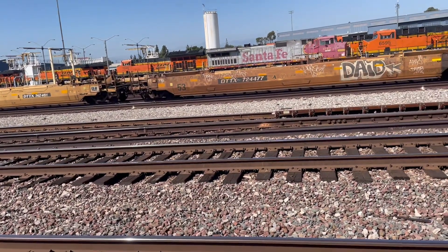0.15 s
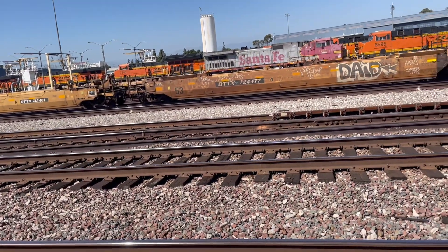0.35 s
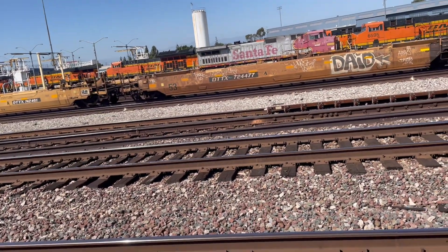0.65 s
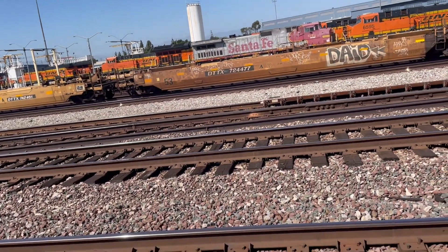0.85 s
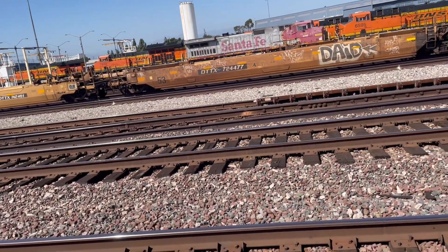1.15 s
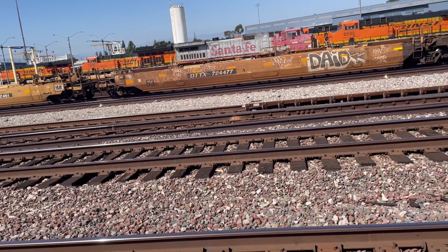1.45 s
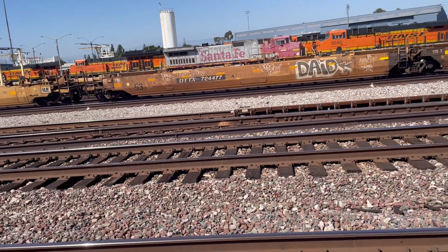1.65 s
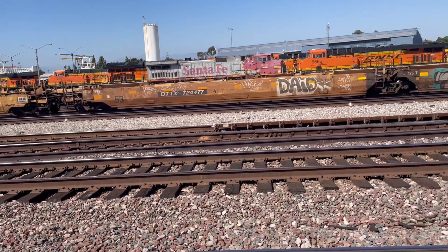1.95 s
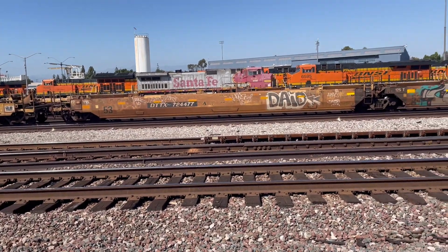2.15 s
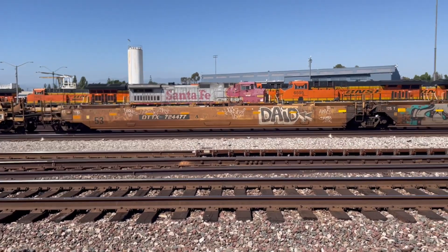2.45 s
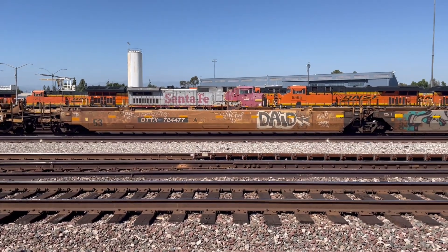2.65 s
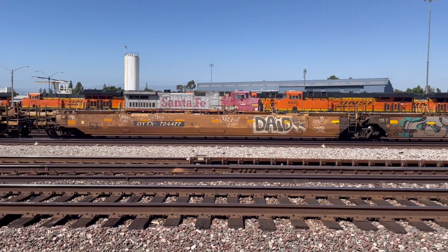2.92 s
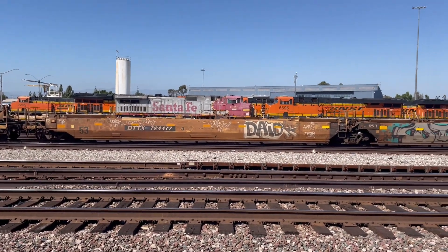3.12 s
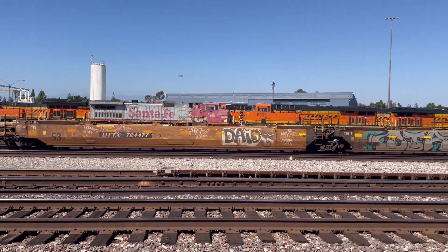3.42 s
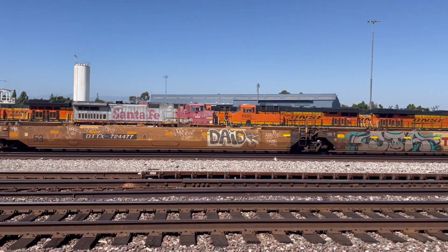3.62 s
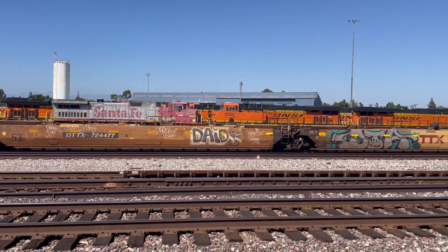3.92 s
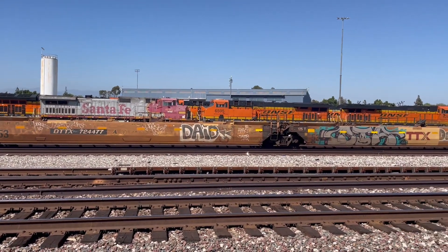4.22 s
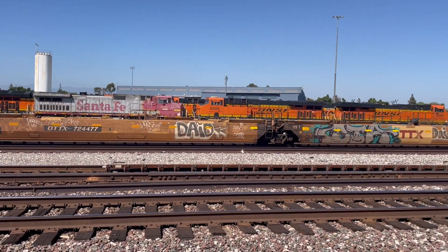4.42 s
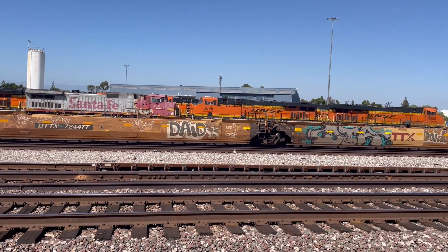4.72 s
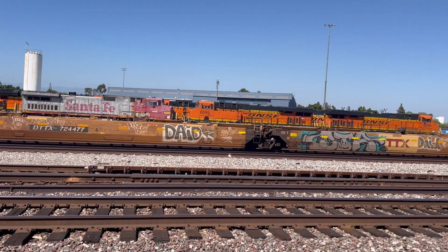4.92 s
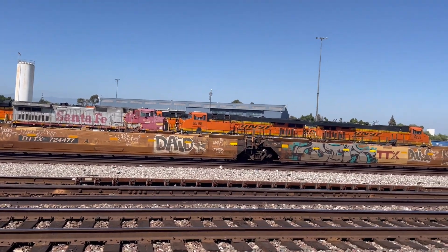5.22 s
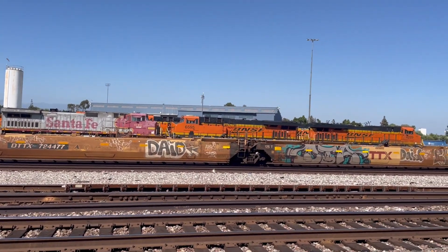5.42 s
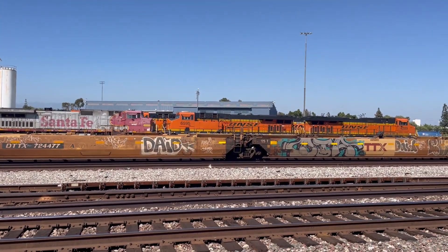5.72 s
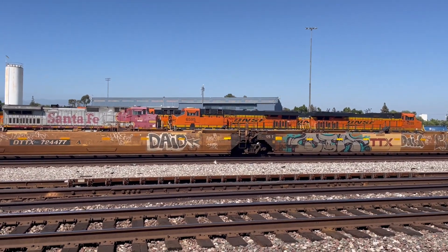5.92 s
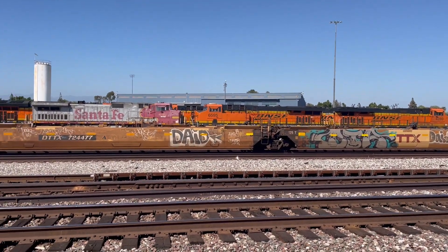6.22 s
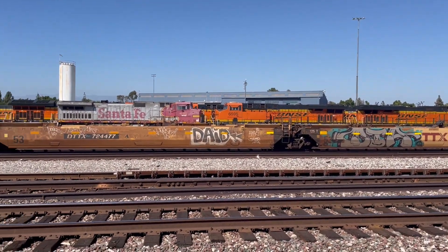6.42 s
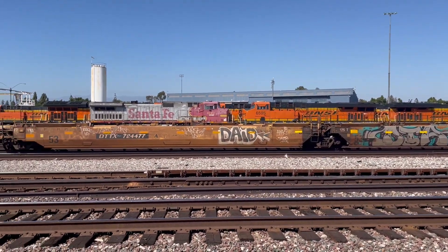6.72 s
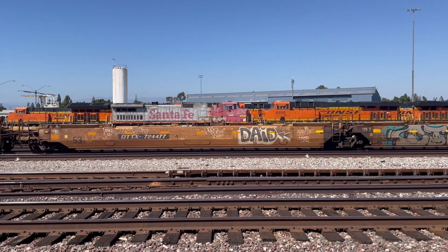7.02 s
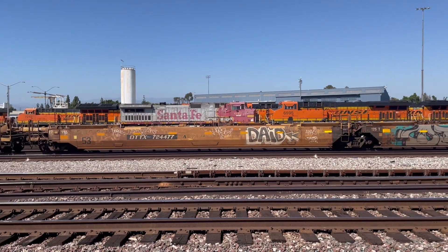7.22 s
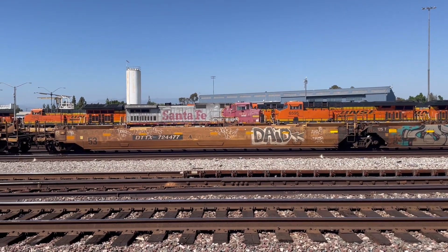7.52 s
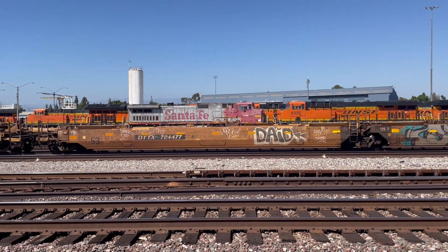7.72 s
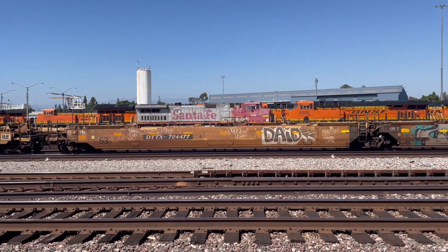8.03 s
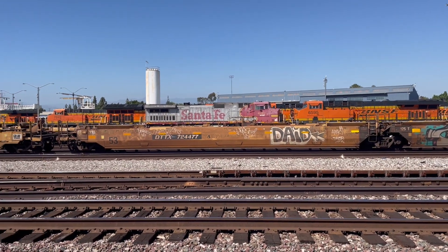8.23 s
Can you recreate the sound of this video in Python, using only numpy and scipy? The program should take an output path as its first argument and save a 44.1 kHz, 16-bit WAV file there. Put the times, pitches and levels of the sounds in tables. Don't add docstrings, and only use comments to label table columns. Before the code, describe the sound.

Low pulsing engine rumble, humming and fan roar in an open yard, buffeted by wind thuds, with air hisses, gritty ticks and insect chirps.

```python
import sys
import numpy as np
from scipy import signal
from scipy.fft import rfft, irfft, next_fast_len
from scipy.io import wavfile
from scipy.ndimage import uniform_filter1d, map_coordinates

SR = 44100
rng = np.random.default_rng(int(sys.argv[2]) if len(sys.argv) > 2 else 0)


def waveform_to_disk(signal):
    frames = np.transpose(np.atleast_2d(signal))
    scaled = np.clip(frames, -1, 1) * 32767
    samples = np.round(scaled).astype(np.int16)
    wavfile.write(sys.argv[1], SR, samples)


def elevation(decibels):
    levels = np.asarray(decibels, float)
    return 10 ** (levels / 20)


N = 368676
T = np.arange(N) / SR

# f/Hz, correlation [-1..1]
PORT_LIKENESS = [(60, 0.62), (200, 0.94), (690, 0.13), (1030, 0.35), (1500, 0.31), (2750, 0.05),
                 (3300, 0.38), (4000, 0.22), (4650, 0.45), (5400, 0.21), (6400, 0.53), (7200, 0.24),
                 (7700, 0.65), (8700, 0.85), (11500, 0.73), (13000, 0.9)]
# f/Hz, density/dB per Hz
JET_SPECTRUM = [(700, -120), (1200, 2.5), (1800, 2.5), (2500, 1.5), (3300, 2), (4200, -1), (5200, -1.5),
                (5600, -7), (6400, -6.5), (7000, -9.5), (7500, -15.5), (8100, -11.5), (9000, -30),
                (10000, -120)]
# f/Hz, density/dB per Hz
FIZZ_SPECTRUM = [(7000, -120), (8000, -1.5), (8700, 0), (9400, 1), (10200, -1.5), (12200, -3.5),
                 (12900, -15.5), (13600, -35), (14500, -120)]


def unit(x):
    return x / np.sqrt(np.mean(x ** 2) + 1e-20)


def along(points, hz):
    f, v = np.transpose(points)
    return np.interp(np.log(hz + 1), np.log(f + 1), v)


def curves(rows):
    s, *cols = np.transpose(rows)
    return [np.interp(T, s, c) for c in cols]


def wobble(rate):
    knots = rng.standard_normal(int(N * rate / SR) + 4)
    return map_coordinates(knots, [T * rate])


def filtered(x, response):
    m = next_fast_len(N + SR // 2)
    return irfft(rfft(x, m) * response(np.fft.rfftfreq(m, 1 / SR)), m)[..., :N]


def rush(spectrum, alike, patchy_db):
    z = signal.stft(rng.standard_normal((2, N)), nperseg=512)[2]
    field = uniform_filter1d(rng.standard_normal(z.shape[1:]), size=6, axis=0)
    field = uniform_filter1d(field, size=12, axis=1)
    pair = signal.istft(z * elevation(patchy_db * unit(field)), nperseg=512)[1][:, :N]

    def mid_side(hz):
        angle = np.arccos(np.clip(along(alike, hz), -1, 1)) / 2
        return elevation(along(spectrum, hz)) * [np.cos(angle), np.sin(angle)]

    mid, side = filtered(pair, mid_side)
    return unit(np.array([mid + side, mid - side]))


def tone(hz, drift, swell_db):
    level_db = swell_db * wobble(1.496) + 2.6 * wobble(7)
    return elevation(level_db) * np.sin(2 * np.pi * (hz * T + rng.random()) + drift * wobble(5.0))


def add(out, s, sound, pan_db, lag=0):
    for side, sign in enumerate((.5, -.5)):
        spot = out[side, round(s * SR) + lag * (1 - side):][:len(sound)]
        spot += elevation(sign * pan_db) * sound[:len(spot)]


def near_engine():
    # crank angle [degrees of 720], level/dB
    cylinders = [(29.9, -9.2), (66.0, -6.8), (109.1, -1.3), (151.8, -5.6), (206.3, -1.8), (256.6, -3.5),
                 (297.6, 2.3), (344.7, -5.9), (404.4, 1.1), (425.6, -1.8), (479.4, -4.1), (532.1, 2.4),
                 (571.6, 2.1), (599.1, -0.3), (644.7, -2.7), (697.7, 1.9)]
    cycle_hz, stack_hz, stack_width_hz = 1.6252, 56, 22
    degrees, db = np.transpose(cylinders)
    cycles = np.arange(int(N / SR * cycle_hz) + 1)[:, None]
    s = (cycles + degrees / 720) / cycle_hz
    strength = elevation(db + 0.8 * rng.standard_normal(s.shape))
    puffs = np.bincount(np.round(s * SR).astype(int).ravel(), strength.ravel())[:N]

    def stack(f):
        damping = 1j * f * stack_width_hz
        return (damping / (stack_hz ** 2 - f * f + damping)) ** 2

    return unit(filtered(puffs, stack))


def far_engine():
    # order, level/dB
    orders = [(7, -19), (8, 8), (9, -2), (12, -23.5), (14, -24)]
    shaft_hz, start_turns = 6.474, .121
    crank = 2 * np.pi * (shaft_hz * T + start_turns)
    return unit(sum(elevation(db + 1.4 * wobble(1.2)) * np.sin(k * crank + 0.091 * wobble(1.5))
                    for k, db in orders))


def alternator():
    # multiple, level/dB rms
    harmonics = [(2, -55), (3, -70), (4, -52), (5, -63), (6, -60.5), (8, -57.5), (9, -59.5), (10, -68)]
    base_hz = 116.56
    return sum(elevation(db + 3.5) * tone(base_hz * k, drift=.13 * k, swell_db=1.0) for k, db in harmonics)


def cooling_fans(effort_db):
    # f/Hz, density/dB per Hz
    roar = [(88, -24.5), (150, -5.5), (174, -11.5), (350, -10), (434, -13.5), (472, -10), (521, -17.5),
            (680, -14), (901, -13.5), (1410, -23.5), (1640, -23), (3630, -44), (4590, -43.5), (7930, -51.5),
            (10300, -90), (17400, -120)]
    level_db = -44 + effort_db + 5.0 + 0.69 * wobble(3.5)
    return elevation(level_db) * rush(roar, PORT_LIKENESS, patchy_db=1.66)


def locomotives():
    # t/s, exhaust level/dB, fan effort/dB
    load = [(0.0, -37, 0.5), (0.7, -25, 0), (1.5, -24, 3), (2.3, -23.5, 2.5), (2.8, -21.5, 2),
            (3.6, -22, 1.5), (4.35, -23, 2), (4.6, -20.5, 1.5), (4.96, -21.5, 2.5), (5.35, -20, 3),
            (5.7, -21.5, 3), (6.02, -19, 2.5), (6.5, -22.5, 4.5), (7.15, -21.5, 3), (7.55, -24.5, 4.5),
            (7.85, -22.5, 2.5), (8.36, -19, 2.5)]
    # f/Hz, density/dB per Hz
    stack_noise = [(15, -29.5), (32, 3.5), (46, 11), (69, 2), (84, -3), (108, -8.5), (200, -37.5),
                   (260, -55), (440, -120)]
    exhaust_db, effort_db = curves(load)
    firing = near_engine() + elevation(-4.5) * far_engine()
    exhaust = elevation(3.5) * unit(firing) + elevation(-6.5) * rush(stack_noise, [(50, 0.95)], patchy_db=2.0)
    return elevation(exhaust_db) * exhaust + alternator() + cooling_fans(effort_db)


def blowers():
    # f/Hz, level/dB rms
    blade_tones = [(105.6, -44), (136.8, -46), (671.5, -63.5), (679, -63.5), (686.5, -64)]
    whine = sum(elevation(db + 2.5) * tone(hz, drift=.7, swell_db=1.0) for hz, db in blade_tones)
    return whine * np.ones((2, 1))


def air_hiss():
    # start t/s, length [s], peak level/dB, fizz over it/dB
    vents = [(1.162, 0.24, -59, -17), (1.514, 0.21, -55.5, -18), (1.927, 0.85, -57.5, -17),
             (2.997, 0.16, -59, -15), (3.35, 0.14, -60.5, -11), (3.774, 0.27, -64, -23),
             (4.21, 0.3, -60, -26), (4.5, 0.34, -58.5, -22), (5.197, 0.66, -58, -22.5),
             (5.55, 0.6, -60.5, -33), (6.023, 0.66, -51, -25), (6.488, 0.59, -53, -21.5),
             (6.925, 0.23, -57.5, -20), (7.095, 0.088, -53, -19), (7.216, 0.048, -52, -20),
             (7.47, 0.43, -44, -19.5), (7.723, 0.55, -47, -19.5), (8.18, 0.38, -55, -26)]
    rise_share = 0.31
    hiss = elevation(-58.5 + 0.29 * wobble(7.3)) ** 2
    top = hiss * elevation(-20) ** 2
    for s, length, db, fizz_db in vents:
        opening = np.interp((T - s) / length, [0, rise_share, 1], [0, 1, 0])
        flow = (elevation(db) * np.sin(np.pi / 2 * opening) ** 1.27) ** 2
        hiss = hiss + flow
        top = top + flow * elevation(fizz_db) ** 2
    jet = np.sqrt(hiss) * elevation(2.5 + 0.25 * wobble(25)) * rush(JET_SPECTRUM, PORT_LIKENESS, patchy_db=1.67)
    fizz = np.sqrt(top) * elevation(2.5 + 1.2 * wobble(40)) * rush(FIZZ_SPECTRUM, PORT_LIKENESS, patchy_db=2.5)
    return jet * elevation([[.8], [-.8]]) + fizz


def wind_pressure():
    # t/s, shared level/dB, crosswind over it/dB
    breeze = [(0.0, -56, 14), (0.2, -33.5, 1.5), (0.75, -43.5, 11.5), (1.05, -36.5, 7.5), (1.7, -26, -6.5),
              (1.87, -30.5, -6), (2.15, -22, -11), (2.55, -39.5, 3), (2.9, -26, -8), (3.2, -26, -2),
              (3.9, -31, -3.5), (4.55, -27.5, 1.5), (4.85, -35.5, -7), (5.5, -34, 2), (6.1, -25.5, -3.5),
              (6.7, -29, 6.5), (7.4, -29.5, 4), (8.36, -24, 3)]
    # f/Hz, density/dB per Hz
    shared_spectrum = [(10, -120), (25, -18.5), (50, -10), (72, 4.5), (95, -2), (130, -9), (250, -17.5),
                       (500, -33), (900, -120)]
    # f/Hz, density/dB per Hz
    opposed_spectrum = [(10, -120), (25, -22.5), (45, -6.5), (62, 2), (85, -5), (120, -18), (250, -19),
                        (500, -40), (900, -120)]
    shared_db, cross_db = curves(breeze)
    opposed_db = shared_db + cross_db + 1.5 * wobble(7.9) + 1.5
    shared_db = shared_db + .8 * wobble(4)
    shared = unit(elevation(2.2 * wobble(16)) * rush(shared_spectrum, [(100, 1.0)], patchy_db=1.0))
    opposed = unit(elevation(2.2 * wobble(12)) * rush(opposed_spectrum, [(100, -0.85)], patchy_db=3.0))
    return elevation(shared_db) * shared + elevation(opposed_db) * opposed


def gust_thump(t, db, sharp):
    turns, t60_s = 2.024, .13
    sweep = np.sin(2 * np.pi * turns * np.log(1 + t * 400 * sharp / turns))
    decay = elevation(db - 60 * t * sharp ** 0.39 / t60_s)
    return -decay * (1 - np.exp(-t * sharp / 0.0076)) * sweep


def gusts():
    # t/s, peak level/dB, sharpness
    head_on = [(0.115, -24, 2.15), (0.147, -21.5, 1), (0.243, -26, 2.9), (0.282, -25.5, 3.2),
               (0.356, -25, 2.4), (0.408, -24.5, 1.12), (0.902, -23, 2), (0.968, -22.5, 2.04),
               (1.251, -21, 1.34), (1.386, -18, 1.26), (1.578, -23.5, 0.8), (1.644, -36, 0.87),
               (1.699, -22, 1.44), (1.718, -13.5, 0.93), (1.81, -21, 0.89), (1.903, -17, 1.04),
               (1.996, -18, 1.02), (2.488, -10.5, 0.86), (2.602, -9.5, 0.72), (2.659, -13.5, 0.88),
               (3.147, -19, 1.25), (3.182, -12, 1.02), (4.24, -26, 1.67), (4.458, -11.5, 1.15),
               (4.507, -18.5, 0.92), (4.528, -17, 1.0), (4.54, -10.5, 0.83), (4.546, -22.5, 3.7),
               (1.122, -33, 5.0), (8.117, -25.5, 2.96), (5.845, -14, 0.77), (6.019, -9, 0.79),
               (8.058, -8, 1.04), (8.119, -5.5, 1.1)]
    # t/s, peak level/dB, sharpness
    light = [(0.054, -37, 1.47), (0.194, -24, 1.7), (0.523, -39, 1.6), (0.977, -25, 1.8),
             (1.228, -22, 0.95), (1.344, -23, 1.8), (1.608, -17, 1.66), (1.748, -18, 1.26),
             (1.984, -21, 1.4), (2.07, -14.5, 1.23), (2.148, -22, 1.48), (2.239, -28, 1.3),
             (2.421, -27, 1.77), (2.453, -23, 1.3), (2.504, -15, 1.65), (2.711, -35, 1.3), (3.319, -19, 1),
             (3.404, -31, 1.6), (3.445, -23, 1.3), (3.912, -25, 1.44), (3.996, -25, 0.59),
             (4.316, -23, 1.4), (4.467, -16.5, 1.67), (5.005, -23, 1.46), (5.455, -28, 1.8),
             (5.87, -15, 1.34), (6.063, -23, 1.5), (6.261, -9.5, 1.02), (6.58, -33, 1.2), (6.926, -27, 1.2),
             (7.485, -20, 1.57), (7.663, -31, 1.27), (7.736, -23, 1.12), (8.015, -24, 1.14),
             (8.089, -25, 1.2)]
    # t/s, peak level/dB
    dull = [(4.872, -18), (5.141, -21), (5.693, -25), (6.162, -12.5), (6.359, -17), (6.7, -15.5),
            (6.781, -15), (7.291, -20), (7.391, -24.5), (7.689, -22), (8.164, -14), (1.025, -28),
            (3.71, -26), (3.826, -27), (4.136, -26), (4.675, -27), (5.282, -28), (6.218, -27)]
    # f/Hz, density/dB per Hz
    turbulence = [(60, -120), (110, -5.5), (200, 5.5), (400, -8.5), (650, -14.5), (1100, -120)]
    blows = head_on + [(s, db - 6.5, sharp) for s, db, sharp in light]
    blows = blows + [(s, db, 0.783) for s, db in dull]
    out, t = np.zeros((2, N)), T[:SR // 8]
    flutter = rush(turbulence, [(200, 0.62)], patchy_db=3.5)
    for s, db, sharp in blows:
        shake = t / .03 * sharp ** 0.24
        swell = elevation(0.56 * db - 19.5) * 4 * shake * np.exp(-3 * shake)
        spot = slice(round(s * SR), round(s * SR) + len(t))
        out[:, spot] += swell[:out[0, spot].size] * flutter[:, spot]
        slap_delay_s, slap_sharp = rng.uniform(.008, 0.02164), sharp * rng.uniform(0.51, 1.0)
        for late, gain_db, edge in ((0, 5, sharp), (slap_delay_s, -3, slap_sharp)):
            thump = gust_thump(t, db + gain_db, edge)
            add(out, s + late, thump, rng.normal(0, 1.2), lag=rng.integers(20))
    return out


def grit():
    # t/s, peak level/dB, treble over it/dB
    scuffs = [(1.186, -45, -20), (1.239, -43, -31), (1.3694, -58, -22), (1.567, -39, -21),
              (1.694, -40, -25), (1.996, -38, -20), (2.031, -39.5, -20), (2.073, -36, -26),
              (2.251, -55, -38), (2.2994, -57, -21), (3.4, -50, -31), (4.3394, -60, -33), (4.899, -47, -19),
              (5.39, -41, -23), (6.29, -39, -25), (6.329, -38, -24), (6.719, -35.5, -22),
              (6.7786, -43, -20), (7.103, -37.5, -23), (7.125, -46, -28), (7.1705, -39.5, -29),
              (7.233, -44, -38)]
    # t/s, level/dB, length [s]
    spits = [
        (2.523, -64, 0.027),
        (2.575, -55, 0.052),
        (2.622, -64, .06),
        (2.689, -63, 0.058),
        (2.75, -68, .06),
        (2.826, -69, .06),
        (3.03, -73, .04),
        (3.287, -72, .03),
    ]
    # f/Hz, density/dB per Hz
    spark = [(7000, -120), (8500, 1), (10500, -1), (12500, 0), (14500, -9), (15500, -23), (16500, -120)]
    body, top, puffs = np.zeros((3, 2, N))
    t = T[:SR // 15]
    for s, db, top_db in scuffs:
        swell = elevation(db - 60 * t / 0.12) * (1 - np.exp(-t / 0.0034))
        crackle = elevation(3.2 * rng.standard_normal(len(t))) * rng.standard_normal(len(t))
        scuff = swell * crackle
        add(body, s, elevation(-1.5) * scuff, pan_db=-4.5)
        add(top, s, elevation(top_db + 8.0) * scuff, pan_db=6.0)
    for s, db, length in spits:
        swell = np.sin(np.pi * np.clip(t / length, 0, 1))
        add(puffs, s, elevation(db) * swell * rng.standard_normal(len(t)), pan_db=-2.5)
    layers = ((body, JET_SPECTRUM), (top, FIZZ_SPECTRUM), (puffs, spark))
    return sum(filtered(x, lambda hz: elevation(along(colour, hz))) for x, colour in layers)


def cricket():
    # t/s, peak level/dB
    chirps = [(0.1875, -54), (0.5352, -54.5), (0.8894, -54), (1.236, -51), (1.5834, -55), (1.9494, -57),
              (2.3143, -49.5), (2.6858, -52), (3.0335, -53), (3.456, -52.5), (3.8382, -50.5),
              (4.1814, -53.5), (4.579, -51), (4.9202, -52), (6.5383, -54), (6.8623, -54), (7.274, -54)]
    stroke_s, lead_in_s, pair_gap_s = .017, .004, .053
    wing_hz, fall_hz_per_s = 4830, 32000
    out, t = np.zeros((2, N)), T[:SR // 40]
    for s, db in chirps + [(s + pair_gap_s, db) for s, db in chirps]:
        swell = np.sin(np.pi * np.clip(t / stroke_s / rng.uniform(.9, 1.1), 0, 1))
        cycles = wing_hz * rng.normal(1, .004) * t - fall_hz_per_s / 2 * t * t * rng.uniform(.9, 1.1)
        stroke = swell * np.sin(2 * np.pi * cycles)
        add(out, s - lead_in_s, elevation(db - 1.7 + rng.normal(0, 0.65)) * stroke, pan_db=-3.0)
    return out


def bird():
    # t/s, f/Hz, level/dB
    calls = [
        [(5.6, 4010, -64), (5.628, 4500, -61), (5.664, 3920, -60), (5.686, 3350, -68), (5.7, 3200, -65)],
        [(3.782, 3740, -68), (3.8, 3420, -67), (3.822, 3100, -61)],
        [(8.24, 3060, -75), (8.266, 3000, -74), (8.276, 3158, -71), (8.29, 3098, -73)],
        [(6.955, 4250, -70), (6.972, 4450, -62), (6.982, 4680, -62), (6.992, 4400, -62), (7.002, 4100, -68)],
        [(7.458, 4950, -66), (7.467, 4680, -60), (7.478, 4600, -67)],
        [(8.218, 4810, -66), (8.23, 4700, -63), (8.245, 4600, -67)],
    ]
    out = np.zeros((2, N))
    for call, pan_db in zip(calls, (8, 5, 3, 0, 0, 0)):
        start, end = call[0][0], call[-1][0]
        hz, db = curves(call)
        hz = uniform_filter1d(hz, size=int(SR * (end - start) / 6))
        db = db + 1.8 * wobble(130)
        edge = np.clip(np.minimum(T - start, end - T) / .006, 0, 1)
        voice = np.sin(np.pi / 2 * edge) ** 2 * np.sin(2 * np.pi * np.cumsum(hz) / SR)
        out += elevation(db + 8.5 + np.array([[.5], [-.5]]) * pan_db) * voice
    return out


def trills():
    # start t/s, length [s], f/Hz, level/dB
    insects = [(1.964, 0.11, 4440, -60), (2.13, 0.13, 4980, -63), (2.35, 0.21, 4620, -64.5),
               (6.118, .14, 4570, -63), (6.192, .2, 4990, -64), (6.54, .13, 4590, -61),
               (6.96, 0.075, 4490, -59), (7.01, .03, 4500, -59), (7.12, .025, 4500, -55),
               (7.228, 0.03, 4850, -54), (8.206, .045, 4670, -59), (8.33, .03, 4290, -56)]
    width_hz = 260
    out = np.zeros((2, N))
    for s, length, hz, db in insects:
        t = T[:int(length * SR)]
        window = np.hanning(int(SR / width_hz))[None]
        blur = signal.fftconvolve(rng.standard_normal((2, len(t))), window, "same")
        buzz = unit(blur[0] * np.sin(2 * np.pi * hz * t) + blur[1] * np.cos(2 * np.pi * hz * t))
        add(out, s, elevation(db) * np.sin(np.pi * t / length) ** 2 * buzz, pan_db=-1.0)
    return out


def ports(x):
    # f/Hz, lead of the left port [radians]
    lead = [(120, 0), (1050, -.65), (1400, -2.0), (2250, -.7), (2650, -.6), (2950, 1.6), (3550, 2.0),
            (4400, .6), (5300, 1.4), (5600, 4.1), (6500, 5.9), (7100, 5.6), (7500, 3.6), (8400, 3.14),
            (9400, 2.8), (11000, 1.6), (11700, 1.0), (12700, .1)]
    hz_points, radians = np.transpose(lead)
    return filtered(x, lambda hz: np.exp(.5j * np.outer([1, -1], np.interp(hz, hz_points, radians))))


def scene():
    yard = locomotives() + blowers() + air_hiss()
    nearby = grit() + cricket() + bird() + trills()
    return ports(yard + nearby) + wind_pressure() + gusts()


def low_pass(x):
    return signal.sosfilt(signal.butter(12, 16000, fs=SR, output="sos"), x)


def record(dry):
    # f/Hz, density/dB per Hz
    high_hiss = [(3000, -120), (7000, -4.5), (8800, 6), (10000, 0.5), (12000, -6), (13300, -8.5),
                 (14000, -16), (14600, -120)]
    cut = filtered(dry, lambda hz: (1j * hz / (30 + 1j * hz)) ** 2)
    hiss = rush(high_hiss, [(9000, 0.97), (10200, .6), (12500, .8)], patchy_db=5.0)
    return low_pass(cut + elevation(-83.5) * hiss)


dry = scene()
out = record(dry)
waveform_to_disk(out)
```